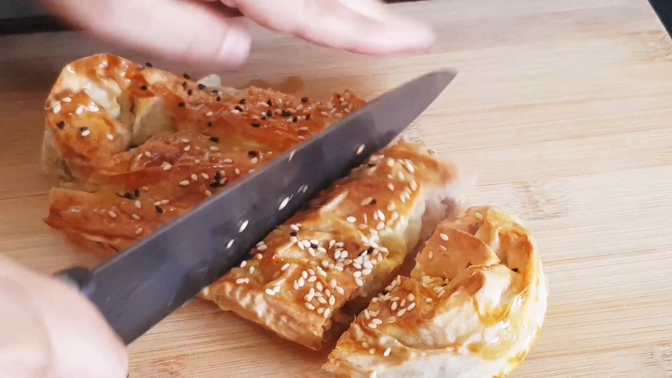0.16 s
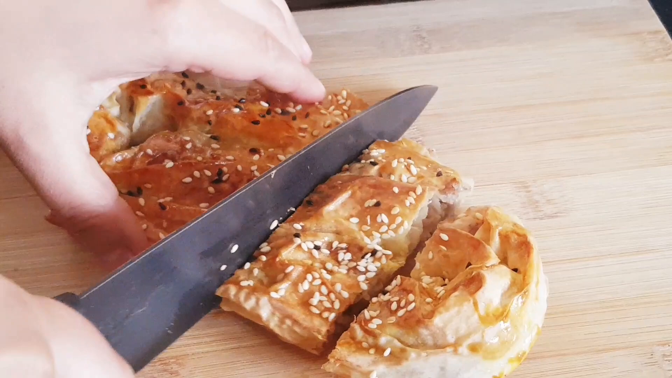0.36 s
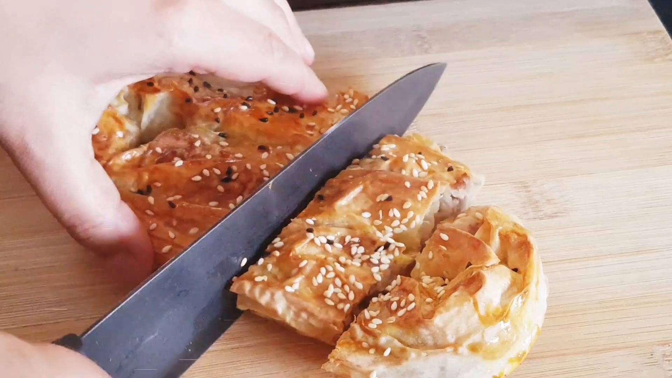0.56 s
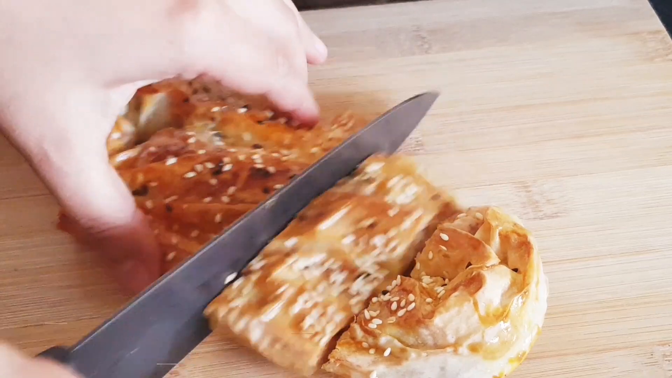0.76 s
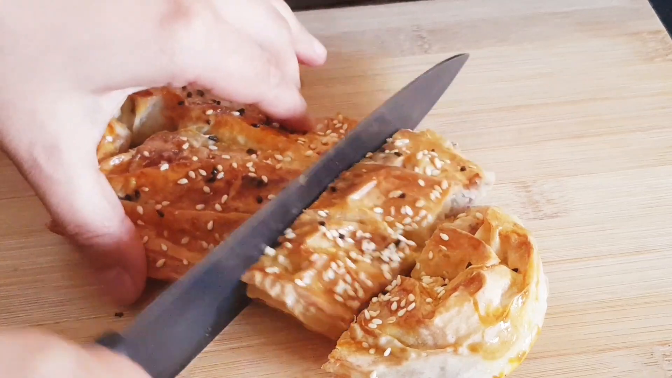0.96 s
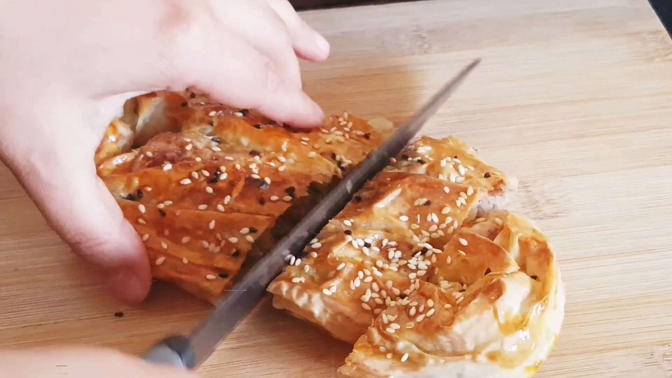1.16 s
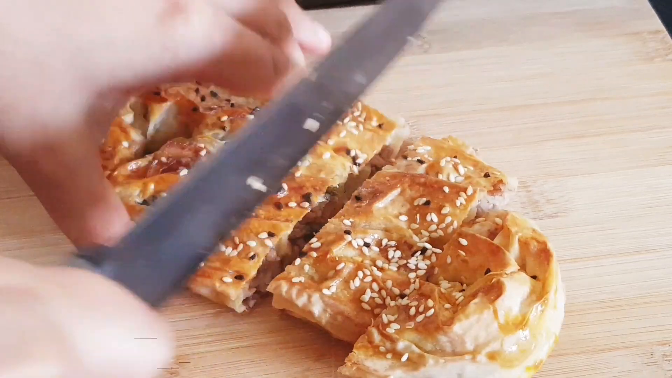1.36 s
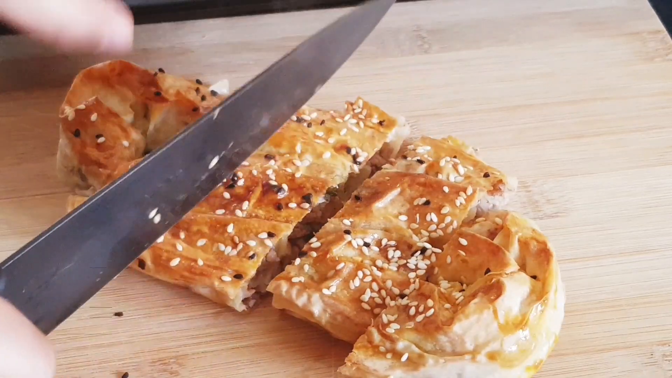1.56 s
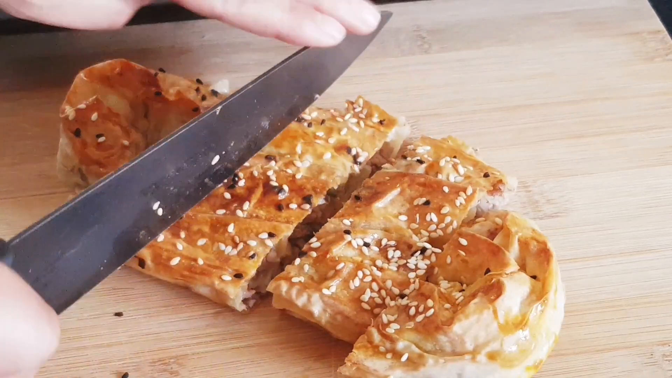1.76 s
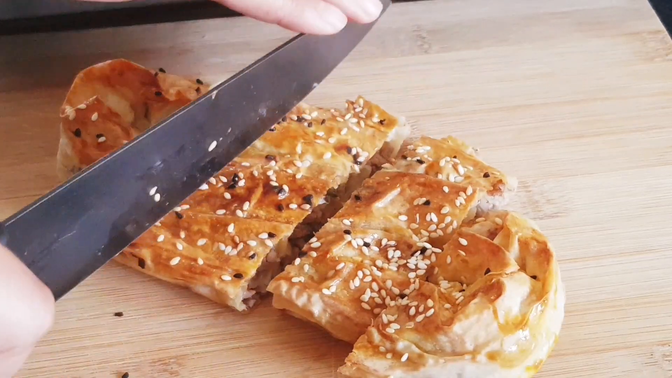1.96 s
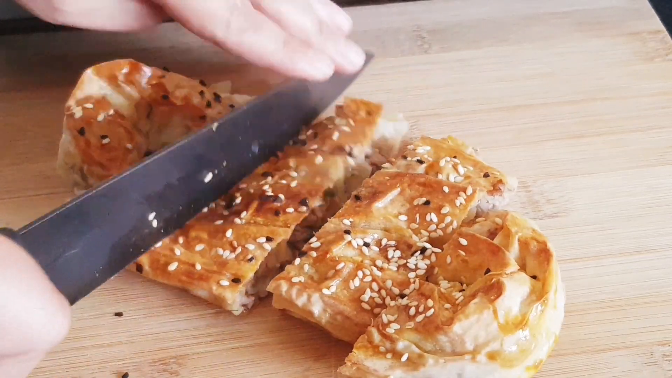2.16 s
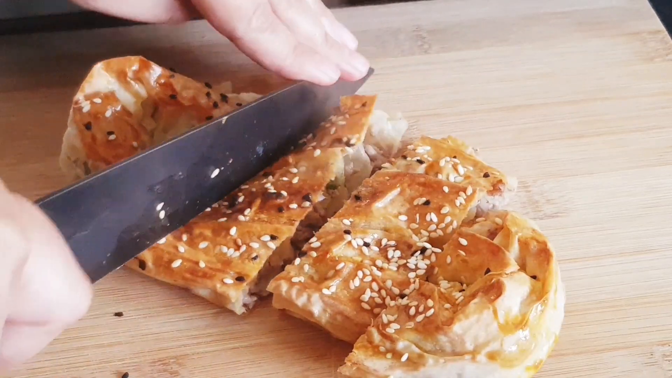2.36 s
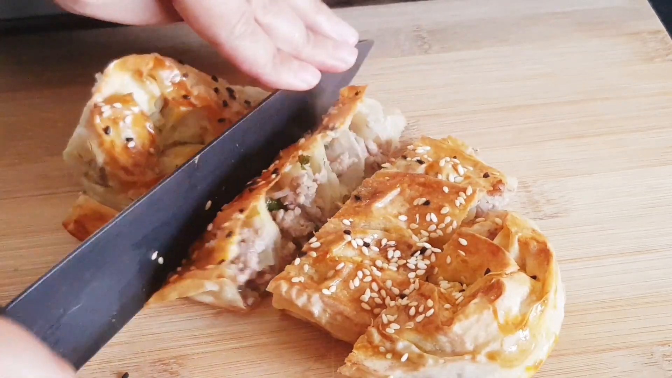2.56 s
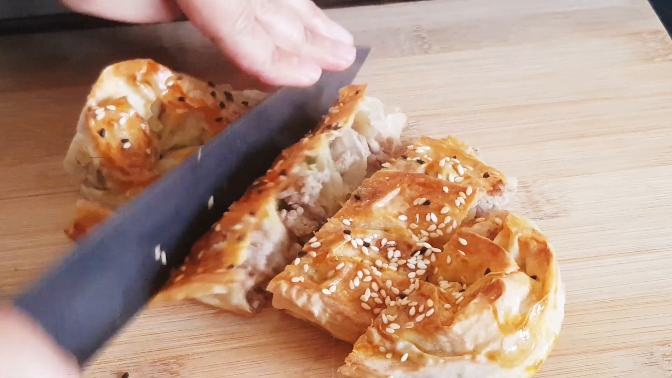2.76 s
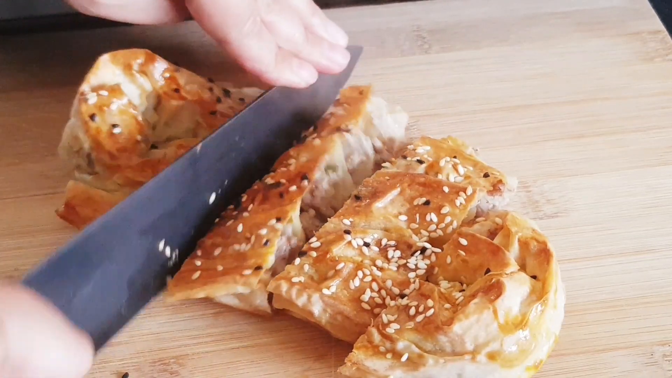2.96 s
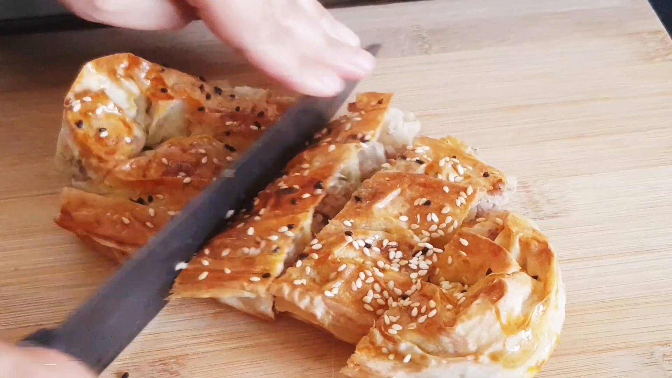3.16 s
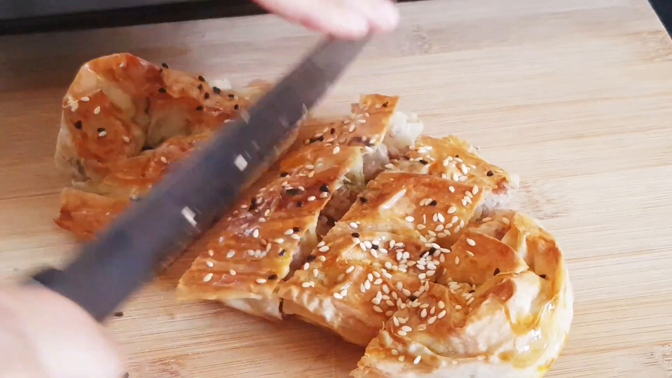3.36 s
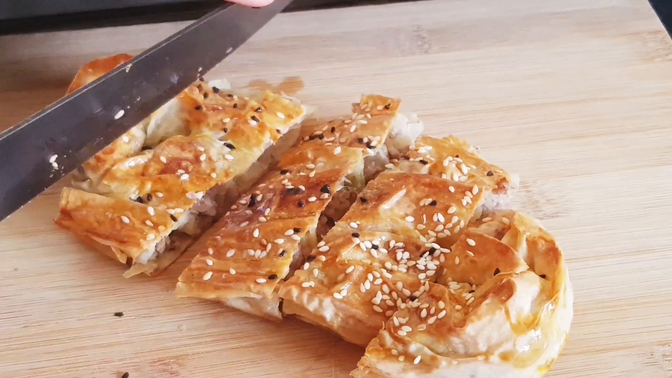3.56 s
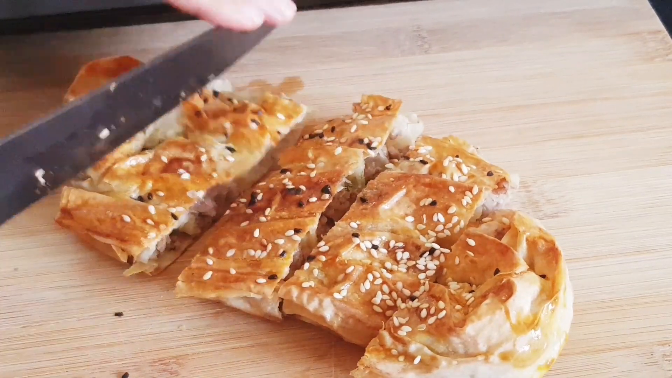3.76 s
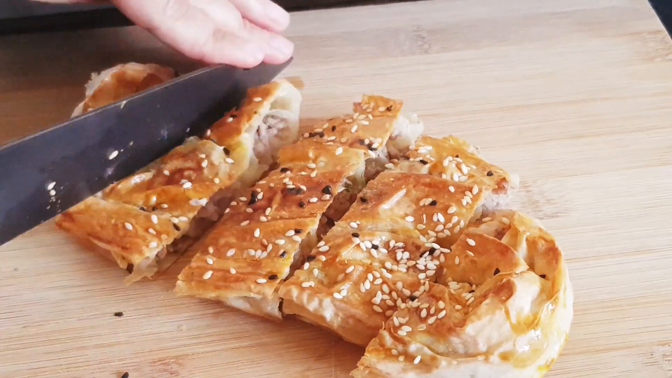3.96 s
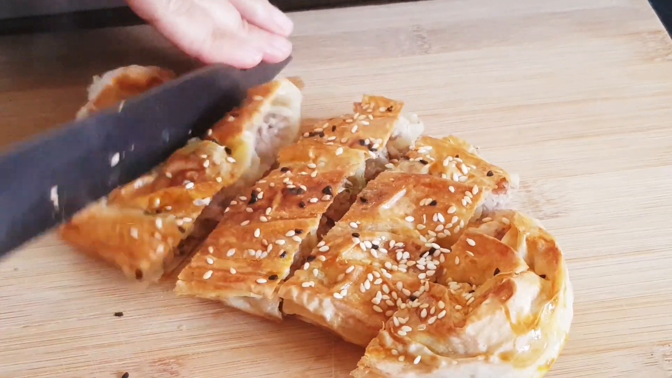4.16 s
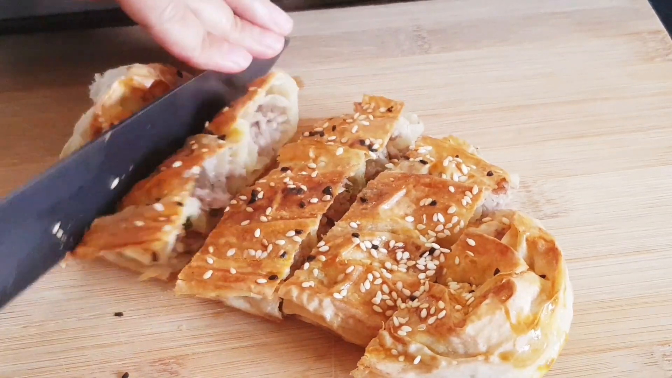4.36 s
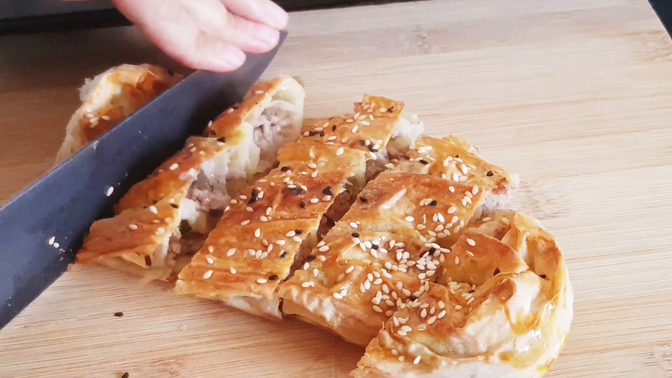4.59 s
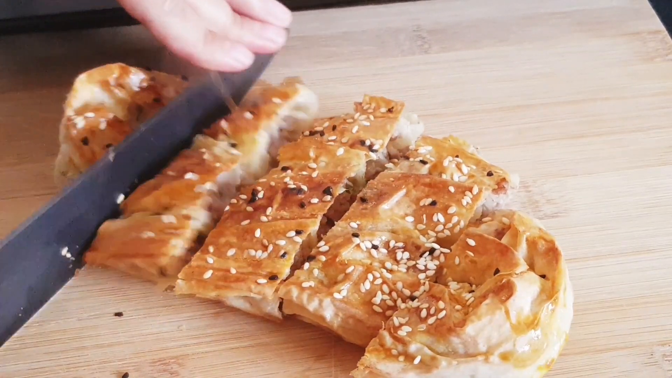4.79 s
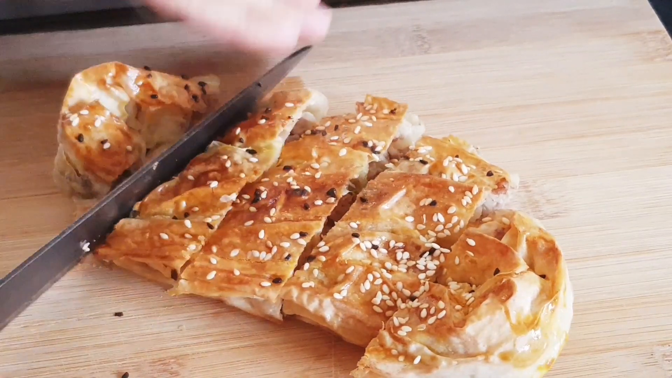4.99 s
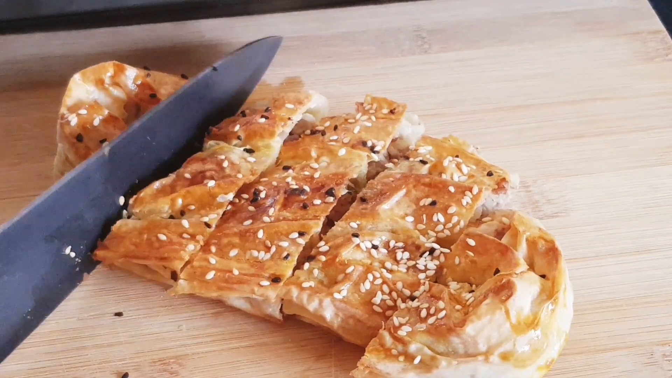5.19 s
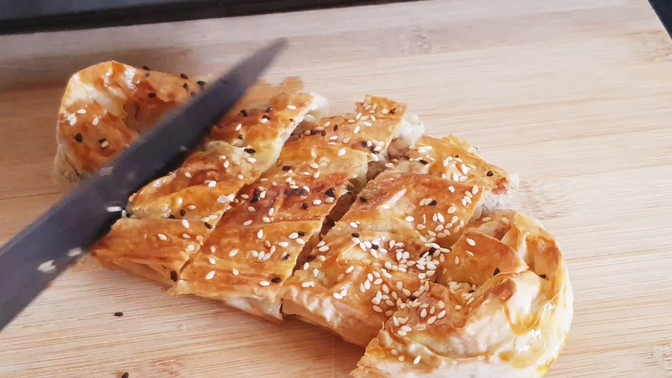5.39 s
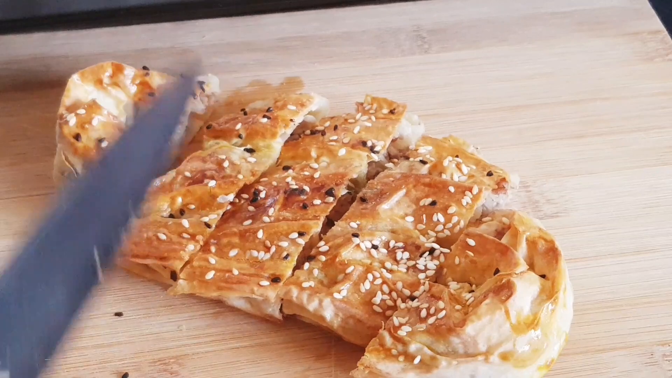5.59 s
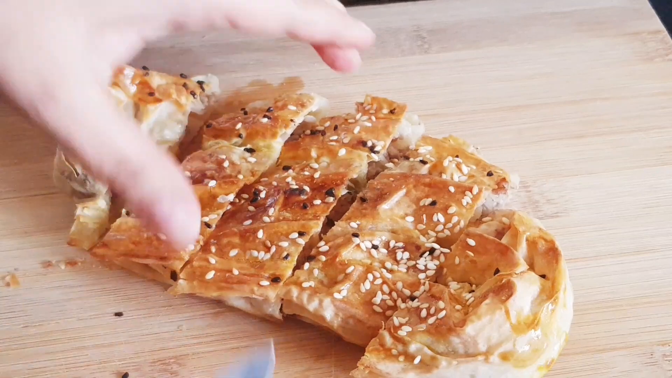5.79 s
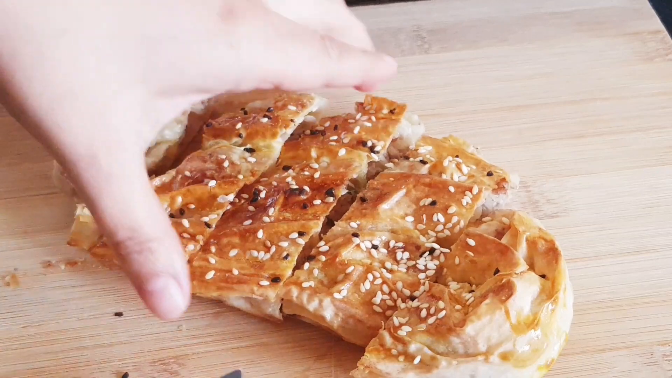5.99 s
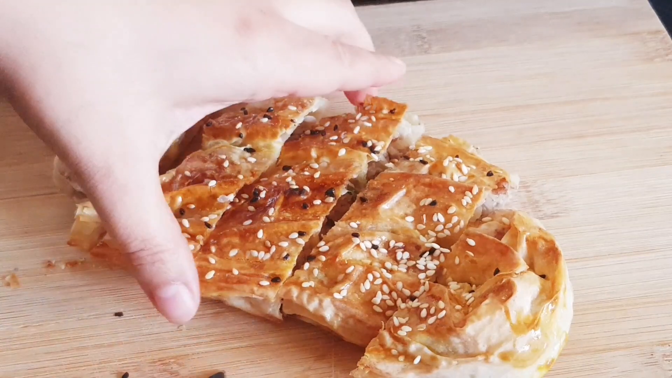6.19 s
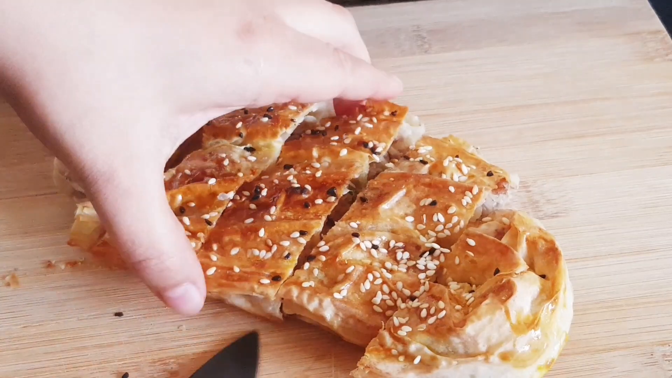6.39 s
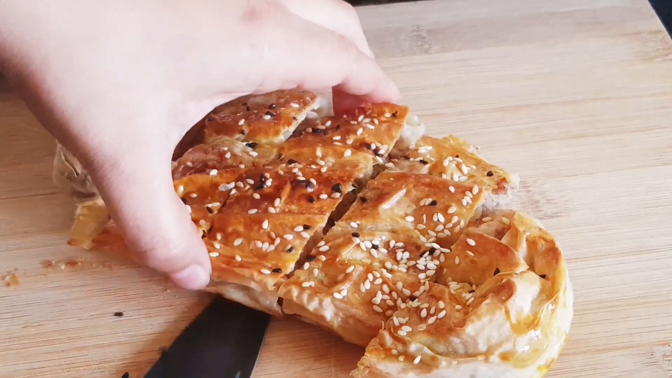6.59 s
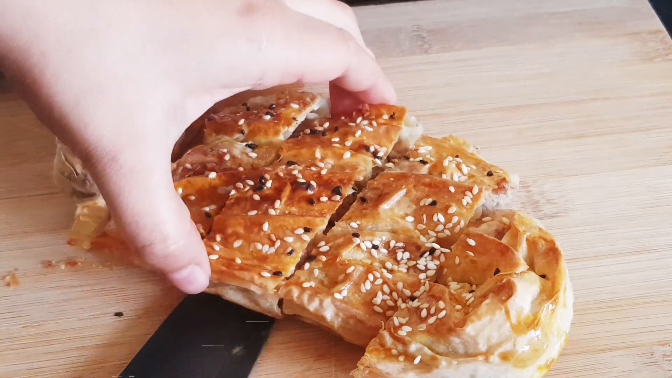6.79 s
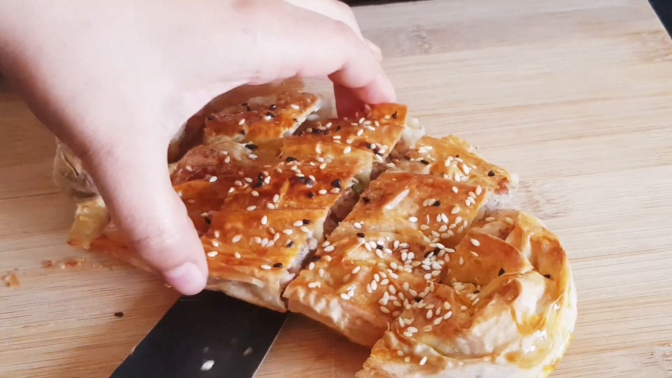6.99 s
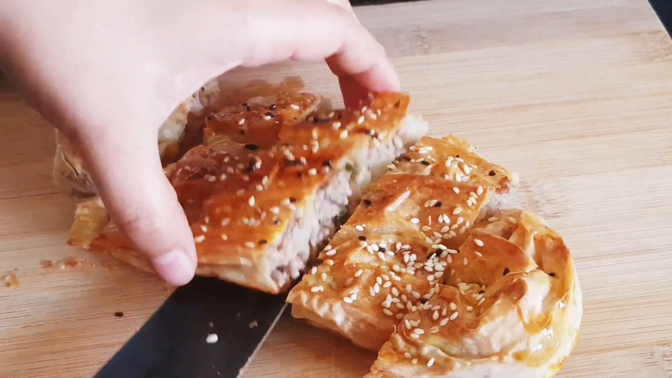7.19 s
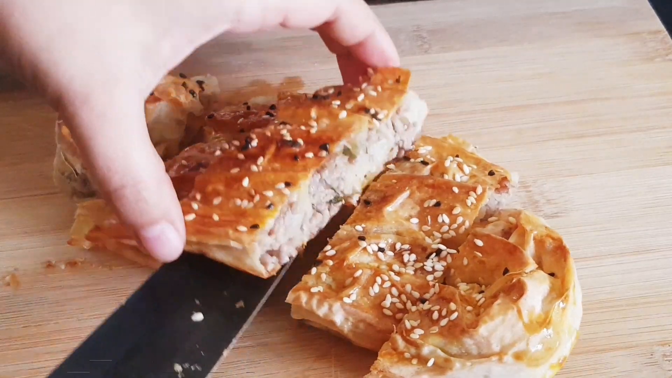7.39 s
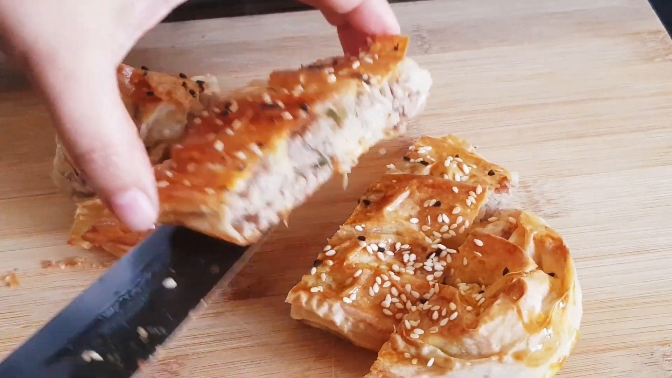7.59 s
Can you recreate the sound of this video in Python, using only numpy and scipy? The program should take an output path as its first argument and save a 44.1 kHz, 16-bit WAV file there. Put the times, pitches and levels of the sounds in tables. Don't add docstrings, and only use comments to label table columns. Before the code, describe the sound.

Brittle crust crunches and snaps under a heavy blade, with dull board knocks, a low refrigerator hum and a faint final slide of steel.

```python
import sys
import numpy as np
from scipy import signal
from scipy.io import wavfile
from scipy.ndimage import uniform_filter1d

SR = 44100
rng = np.random.default_rng(int(sys.argv[2]) if len(sys.argv) > 2 else 0)


def wav_out(sig):
    wavfile.write(sys.argv[1], SR, np.round(np.clip(np.atleast_2d(sig).T, -1, 1) * 32767).astype(np.int16))


def rack_gain(trim_db):
    fader = np.asarray(trim_db, float)
    return 10 ** (fader / 20)


N = 336924

# (frequency [Hz], level [dB])
CRUST = [(1470, -45.5), (2500, -1.5), (3980, -3), (4560, -1.5), (5870, -4), (8570, -7.5), (10200, -5.5),
         (12000, -3.5), (15900, -6.5), (16500, -35)]
# (time [s], peak level [dB], blow frequency [Hz], edge tick [dB], board ring [dB], woody
# noise tail [dB]), the last three against the blow
KNOCKS = [
    (0.827, -13.5, 1320, -41, -18, -24),
    (2.741, -7, 1470, -13, -16.5, -21.5),
    (4.771, -3, 1268, -19.5, -14, -21),
    (6.165, -55.5, 1240, -26, -16.5, -7),
]


def evened(x):
    return x / np.sqrt(np.mean(x ** 2) + 1e-20)


def read(points, hz):
    f, value = np.transpose(points)
    return np.interp(np.log(hz + 1), np.log(f + 1), value)


def add(mix, s, sound):
    part = mix[..., round(s * SR):][..., :sound.shape[-1]]
    part += sound[..., :part.shape[-1]]


def causal(points):
    hz = abs(np.fft.fftfreq(4096, 1 / SR))
    log_gain = np.log(rack_gain(np.maximum(read(points, hz), -70)))
    phase = -signal.hilbert(log_gain).imag
    taps = np.fft.ifft(np.exp(log_gain + 1j * phase)).real[:1024]
    return taps / np.linalg.norm(taps)


def resonate(x, hz, width):
    r = np.exp(-np.pi * abs(width) / SR)
    if np.ndim(hz) == 0:
        return 2 * signal.lfilter([1 - r], [1, -r * np.exp(2j * np.pi * hz / SR)], x).real
    turn = np.exp(2j * np.pi * np.cumsum(hz) / SR)
    return 2 * (turn * signal.lfilter([1 - r], [1, -r], x / turn)).real


def ring(modes, seconds=.6):
    t = np.arange(round(seconds * SR)) / SR
    return sum(rack_gain(db - 60 * t / t60) * np.sin(2 * np.pi * (hz * t + rng.random()))
               for hz, db, t60 in modes)


def panned(x, pan_db):
    return rack_gain([[pan_db / 2], [-pan_db / 2]]) * x


def fridge():
    # (frequency [Hz], width [Hz], level [dB], steady share [ratio])
    tones = [(49.2, 2.7, -48, 5.7), (99.6, 7.2, -59.5, 4.8), (160.3, 9.2, -69.5, 0.36),
             (200, 9.4, -74.5, 0.49), (290.4, 6, -79, 1), (498.6, 6, -70.5, 3.4), (590, 6.3, -81, 1.2)]
    t, out = np.arange(N) / SR, 0
    for hz, width, db, steady in tones:
        skirt = evened(resonate(resonate(rng.standard_normal(N), hz, width), hz, width))
        line = np.sin(2 * np.pi * (hz * t + rng.random()))
        out = out + rack_gain(db) * evened(steady * line + skirt)
    return panned(out, 0.82)


def air():
    # (frequency [Hz], level [dB per Hz])
    hiss_spectrum = [(45, -29.5), (70, -13.5), (127, -15.5), (172, -22.5), (346, -27.5), (502, -29.5),
                     (837, -36), (3370, -53), (3970, -55), (7430, -57.5), (8540, -65), (10500, -58.5),
                     (12700, -52), (16000, -55)]
    # (frequency [Hz], left-right likeness [ratio])
    likeness = [(60, 0.85), (180, 0.92), (550, -0.18), (1650, -0.049), (4970, -0.48), (15000, 0.083)]
    frames, hz = N // 512 + 5, np.fft.rfftfreq(2048, 1 / SR)
    a, b, c, d, patches = rng.standard_normal((frames, 1025, 5)).T
    patches = evened(uniform_filter1d(uniform_filter1d(patches, size=20, axis=0), size=8, axis=1))
    same = np.clip(read(likeness, hz), -1, 1)[:, None]
    left = a + 1j * b
    right = same * left + np.sqrt(1 - same ** 2) * (c + 1j * d)
    z = np.array([left, right]) * rack_gain(read(hiss_spectrum, hz)[:, None] - 0.5 * patches)
    hiss = signal.istft(z, nperseg=2048, noverlap=1536)[1][:, :N]
    return panned(rack_gain(-58.5) * evened(hiss), 0.77)


def pressure():
    # (peak time [s], swell
    # [s], peak level [dB], fade [dB per s], dull crumb against the crackle [dB])
    presses = [(.317, .002, -72, 115, 2.5), (0.459, 0.018, -58.5, 204, 3.5),
               (0.545, 0.021, -58.5, 248, 5.5), (0.584, 0.049, -58.5, 138, -0.5),
               (0.714, 0.046, -45.5, 261, 7.5), (0.828, 0.027, -54, 299, 11.5), (0.863, 0.043, -48, 277, 1),
               (1.027, 0.052, -62.5, 276, 6.5), (1.972, 0.002, -53.5, 160, 1.5),
               (2.06, 0.03, -62.5, 601.5, 0.5), (2.083, 0.007, -42, 160.5, -10.5),
               (2.413, 0.058, -42.5, 101, -1.5), (2.56, 0.036, -78, 100, 0),
               (2.687, 0.0009, -70.5, 1495, -4), (2.74, 0.022, -49, 897.5, -0.5),
               (2.744, 0.0038, -35.5, 424, -2.5), (2.79, 0.0097, -63.5, 121, -3),
               (3.712, .002, -73.5, 1500.5, 21), (3.85, 0.004, -58, 151, -2), (3.79, .002, -67, 151.5, -9),
               (3.915, 0.04, -44.5, 191.5, -2.5), (4.02, 0.028, -69.5, 90.5, -3),
               (4.204, 0.036, -32.5, 313, -6), (4.229, 0.026, -38.5, 175.5, -9.5),
               (4.46, .03, -62.5, 197, 3), (4.493, 0.034, -45, 150.5, 0.5), (4.765, 0.023, -53, 399, -2.5),
               (4.78, .004, -62, 114.5, -6.5)]
    shifting_flakes = [(.072, .002, -74.5, 60, -4), (.17, 0.043, -94, 80, 25.5),
                       (1.22, 0.081, -77.5, 105, 12.5), (1.295, 0.0068, -84, 152, -8),
                       (2.9, 0.15, -67, 149, 10.5), (2.987, 0.022, -71.5, 200, 15),
                       (3.16, 0.073, -81, 100.3, 10.5), (3.27, 0.019, -72.5, 251, -4),
                       (5.46, 0.055, -80.5, 129, -3), (6.171, 0.0045, -80.5, 88.7, 0),
                       (6.3, 0.0082, -76.5, 120, 4), (6.5, 0.1, -75, 60, -1), (6.66, 0.067, -71, 200, -4),
                       (6.75, 0.012, -75, 300, -9), (6.97, 0.18, -73.5, 100, -1),
                       (6.96, 0.061, -91, 250, 3), (7.112, 0.0013, -70.5, 156, -5.5),
                       (7.43, 0.045, -79, 146, -1.5)]
    bite_db, faded_db = 10.5, 47
    creep_s, creep_db = 0.0049, -20
    levels = np.zeros((3, N))
    for peak_s, swell, db, fade, dull_db in presses + shifting_flakes:
        swell, fade = max(swell, .0005), max(fade, 30)
        t = np.arange(-swell, faded_db / fade, 1 / SR)
        faded = fade * np.maximum(t, 0)
        level = db + bite_db * np.minimum(t, 0) / swell - faded
        thin = 1 - 0.65 * dull_db - 0.31 * faded
        dull = dull_db + 0.033 * faded
        creep = rack_gain(level[0] + creep_db) * np.linspace(0, 1, round(creep_s * SR))
        add(levels, max(peak_s - swell - creep_s, 0), creep[None])
        add(levels, peak_s - swell, rack_gain([level, level + thin, level + dull]))
    return levels


def patchy(x):
    z = signal.stft(x, nperseg=256)[2]
    patches = rng.standard_normal(z.shape[1:][::-1]).T
    patches = evened(uniform_filter1d(uniform_filter1d(patches, size=6, axis=0), size=8, axis=1))
    return signal.istft(z * rack_gain(2.3 * patches), nperseg=256)[1][:, :N]


def crumble():
    # (frequency [Hz], level [dB])
    crumb_spectrum = [(320, -17), (550, -2), (666, -14), (731, -4), (1130, -3), (2160, -8), (3000, -14),
                      (3900, -18.5), (6600, -120)]
    fractures_per_s, spread_db = 1300, 2.8
    clumps = evened(uniform_filter1d(uniform_filter1d(rng.standard_normal(N), size=250), size=250))
    levels = pressure() * rack_gain(2 * clumps)
    size = rack_gain(spread_db * np.minimum(rng.exponential(1, N), 2.6))
    size = size * (rng.random(N) < fractures_per_s / SR)
    bursts = signal.lfilter([1], [1, -np.exp(-1 / (0.00033 * SR))], size)
    a, b, c, d = rng.standard_normal((4, N))
    bright = (evened(bursts) + 0.6) * np.array([a + b, a - b])
    bright = signal.oaconvolve(bright, causal(CRUST)[None])[:, :N]
    lowpass = signal.firwin(33, 9000, fs=SR)
    thick = signal.oaconvolve(bright, lowpass[None], "same")
    soft = evened(uniform_filter1d(bursts, size=60)) + 0.67
    soft = soft * np.array([c + 0.89 * d, c - 0.81 * d])
    soft = evened(signal.oaconvolve(soft, causal(crumb_spectrum)[None])[:, :N])
    crackle = levels[0] * evened(thick) + levels[1] * evened(bright - thick)
    crumbs = levels[2] * soft
    return patchy(panned(crackle * rack_gain(-1.5), 3.5) + panned(crumbs * rack_gain(-1.0), 1.7))


def snaps(cracks):
    # (frequency [Hz], level [dB])
    layer = [(1500, -38.5), (2600, -6.5), (3500, -8.5), (5000, -4.5), (7000, -2), (8800, -6.5), (12500, -1),
             (16000, -8)]
    # (frequency [Hz], level [dB])
    slice_body = [(400, -22), (800, -10), (1250, -4), (1550, -4), (1900, -2), (2300, -8), (2900, -27),
                  (6000, -60)]
    out, t = np.zeros((2, N)), np.arange(900) / SR
    noise = rng.standard_normal((len(cracks), 2, 900))
    place = rng.uniform(-0.41, 1, len(cracks))
    crust, body = causal(layer), causal(slice_body)
    decay = np.exp(-t / .00045) + rack_gain(-16) * np.exp(-t / 0.0036)
    for (s, db, hz, dull_db), (a, b), side in zip(cracks, noise, place):
        burst = decay * np.array([a + 0.49 * b, a - 0.19 * b])
        burst = signal.oaconvolve(burst, crust[None])[:, :900]
        burst = burst + 2.7 * resonate(burst, hz, 3000)
        tap = np.convolve(np.exp(-t / 0.00099) * b, body)[:900]
        crack = burst / abs(burst).max() + rack_gain(dull_db) * tap / abs(tap).max()
        left, right = panned(rack_gain(db) * crack, 2.0 + 0.68 * side)
        add(out[0], s + 0.00066, left)
        add(out[1], s + 0.00066 + side * .00007, right)
    return out


def kitchen():
    # (frequency [Hz], t60 [s])
    decay_times = [(100, 1), (500, 0.53), (1400, 0.39), (4000, 0.25), (9000, 0.17), (15000, 0.13)]
    taps = np.zeros((2, SR))
    at = np.arange(100, SR - 20, 20) + rng.integers(0, 20, (2, (SR - 101) // 20))
    np.put_along_axis(taps, at, rng.choice([-1., 1.], at.shape), 1)
    hz, t, z = signal.stft(taps, SR, nperseg=256)
    tail = signal.istft(z * rack_gain(-60 * t / read(decay_times, hz)[:, None]), SR, nperseg=256)[1]
    return tail / np.linalg.norm(tail[0])


def rattle(modes):
    out = 0
    for hz, db, t60 in modes:
        moved = (hz * (1 + .03 * rng.standard_normal()), db, t60)
        unrest = evened(uniform_filter1d(rng.standard_normal(round(.6 * SR)), size=900))
        out = out + ring([moved]) * (1 + .6 * unrest)
    return out


def thumps():
    # (time [s], peak level [dB], deep modes [dB], board modes [dB], rise [s]),
    # both mode levels against the upper ones
    pushes = [(0.549, -46, -15, 6, 0.023), (0.691, -46, -21, 1.5, 0.018), (0.829, -34, -4, 4, 0.0077),
              (0.9, -40, -4, -2, 0.0069), (1.016, -58, 16.5, -24, 0.0061), (2.186, -43, -24.5, 8.5, 0.0014),
              (2.443, -41.5, -2.5, -1, 0.0048), (2.749, -22.5, -5, -6.5, 0.0014),
              (2.837, -33, -11, -5, 0.0058), (2.981, -26.5, -14, -11.5, 0.0071),
              (3.089, -41.5, -2.5, -11, 0.0056), (3.93, -36.5, -5.5, 4.5, 0.008),
              (4.2, -32.5, -4, 5.5, 0.023), (4.31, -39, -2, -16.5, 0.005), (4.563, -34.5, -4, -4, 0.012),
              (4.769, -29, -7.5, 7.5, 0.002), (4.861, -39.5, -9, 12.5, 0.0099),
              (6.163, -38, -22, -3.5, 0.026), (6.215, -43, -14.5, -22, 0.0056)]
    # (frequency [Hz], level [dB], t60 [s])
    counter_deep = [(67.47, 3, 0.69), (97.8, 1.5, 0.66)]
    counter_upper = [(138.2, -1.5, 0.44), (167.3, -3.5, 0.45), (204.6, -3, 0.28), (259, -8, 0.18)]
    board_low = [(292, -1.5, 0.27), (352, -1, 0.21), (447, -3, 0.05), (421.2, -2.5, 0.27),
                 (484, -4.5, 0.39), (553, -4, 0.21)]
    out, t = np.zeros(N), np.arange(round(.6 * SR)) / SR
    for s, db, deep_db, board_db, rise in pushes:
        body = rack_gain(deep_db - 5.5) * rattle(counter_deep)
        body = body + rack_gain(-7.0) * rattle(counter_upper)
        body = body + rack_gain(board_db - 12.5) * rattle(board_low)
        add(out, s, rack_gain(db) * body * (1 - np.exp(-t / max(rise, .001))))
    return panned(out, 0.7)


def knocks():
    # (frequency [Hz], level [dB], t60 [s])
    board_modes = [(474.3, -13.5, 0.31), (581, 2.5, 0.038), (807, -11.5, 0.29), (1033, -18.5, 0.42),
                   (1130, -31, 0.73), (1470, -23, 0.4), (1600, -30, 0.29)]
    # (frequency [Hz], level [dB])
    woody_tail_spectrum = [(120, -32), (200, -10), (323, -4.5), (480, -7), (610, -6), (1140, -1), (2290, -34),
                           (3100, -38), (3900, -55), (4800, -40), (9000, -50.5), (11700, -76.5), (19800, -120)]
    out, t, long = np.zeros((2, N)), np.arange(400) / SR, np.arange(round(.5 * SR)) / SR
    for s, db, hz, tick_db, ring_db, woody_tail_db in KNOCKS:
        u = (t - .0029) * hz
        add(out, s, rack_gain(db) * np.exp(-(u / 0.74) ** 2) * np.sin(-2 * np.pi * u))
        tick = np.convolve(rng.standard_normal(len(t)) * np.exp(-t / 0.0018), causal(CRUST))
        add(out, s + 0.0019, rack_gain(db + tick_db) * tick / abs(tick).max())
        board = ring(board_modes)
        add(out, s + .004, rack_gain(db + ring_db) * board / abs(board).max())
        a, b = rng.standard_normal((2, len(long))) * rack_gain(db + woody_tail_db - 60 * long / 0.28)
        woody_tail = signal.oaconvolve([a + .5 * b, a - .5 * b], causal(woody_tail_spectrum)[None])
        add(out, s + 0.0048, woody_tail)
    return panned(out, 3.2)


def face():
    # (frequency [Hz], level [dB], t60 [s])
    face_modes = [(287, -7.5, 0.35), (392, -5.5, 0.28), (479, 1, 0.3), (622, -10, 0.35), (671, -8.5, 0.29),
                  (730, -0.5, 0.29), (807, 1, 0.18), (1034, -3, 0.341), (1089, -6, 0.43),
                  (1163, -6.5, 0.23), (1201, 0.5, 0.16), (1292, 0.5, 0.36), (1410, -8, 0.38),
                  (1836, -22, 0.41)]
    out = np.zeros(N)
    for s, db, *_ in KNOCKS:
        board = ring(face_modes)
        add(out, s + .0045, rack_gain(db - 22.5) * board / abs(board).max())
    return panned(out, 2.0)


def catches():
    # (time [s], length [s], frequency [Hz], level [dB])
    grain_catches = [(6.157, 0.082, 1023, -63.5), (6.19, 0.064, 1460, -76), (6.234, .09, 910, -70.5),
                     (6.291, 0.064, 1600, -71), (6.301, .09, 1050, -78), (6.298, .07, 2300, -82),
                     (6.41, .045, 1600, -72), (6.408, 0.083, 1000, -70), (6.471, 0.044, 1750, -69.5),
                     (6.491, .06, 940, -67), (6.5, .1, 1560, -73), (6.517, .08, 1035, -67),
                     (6.576, .09, 1600, -73), (6.58, 0.082, 2250, -77), (6.581, .08, 3000, -73),
                     (6.59, .05, 960, -75), (6.63, 0.077, 6000, -78), (6.728, 0.033, 6000, -75),
                     (6.483, 0.13, 2600, -80), (6.24, 0.073, 503, -64), (6.416, .08, 260, -70),
                     (6.86, .07, 1553, -75.5), (6.88, .11, 4500, -78), (6.951, .05, 2400, -77),
                     (7.014, .04, 1900, -79.5)]
    out = np.zeros(N)
    for s, length, hz, db in grain_catches:
        u = np.arange(0, 1, 1 / (length * SR))
        width = 0.074 * hz
        noise = rng.standard_normal(2 ** 13)[:len(u)]
        mode = evened(resonate(resonate(noise, hz, width), hz, 2.0 * width))
        add(out, s, rack_gain(db) * mode * np.sin(np.pi * np.sqrt(u)))
    return panned(out, 4.0)


def slide():
    # (time [s], ringing steel [dB], rubbed wood against it [dB])
    rubs = [
        [(6.16, -65, 11.5), (6.172, -79, -3), (6.24, -76, -30), (6.3, -66.5, -11), (6.4, -71.5, -20),
         (6.5, -67.5, -2.5), (6.63, -67, 1.5), (6.72, -96.5, 15)],
        [(6.8, -89, 7), (6.872, -66.5, -3.5), (6.968, -68.5, 3.5), (7.1, -83, -7)],
    ]
    # (frequency [Hz], width [Hz], level [dB])
    blade_modes = [(523, 115, 3), (1010, 160, -6), (1600, 160, -13), (2560, 130, -6), (5900, 170, -16),
                   (7400, 310, -10.5), (7900, 260, -13)]
    # (frequency [Hz], level [dB])
    grain_spectrum = [(410, -36), (700, -20), (823, -11), (1900, 13), (4230, -7), (6000, -33), (7800, -40),
                      (13200, -120)]
    # (frequency [Hz], width [Hz], level [dB])
    squeak_modes = [(1800, 600, -14), (2690, 290, -6.5), (4200, 450, -13)]
    s, steel_db, wood_db = np.transpose(np.concatenate(rubs))
    t, out = np.arange(s[0], s[-1], 1 / SR), np.zeros(N)
    under_s = rubs[1][0][0]
    unevenness = evened(uniform_filter1d(rng.standard_normal(len(t)), size=400))
    rub = rng.standard_normal(len(t)) * rack_gain(2.0 * unevenness)
    wander = uniform_filter1d(rng.standard_normal((len(blade_modes), len(t))), size=2600)
    contact = rack_gain(6.0 * evened(wander))
    steel = 0
    for (hz, width, db), touch in zip(blade_modes, contact):
        mode = resonate(resonate(rub, hz, width), hz, 2.0 * width)
        steel = steel + rack_gain(db) * evened(mode * touch) * np.sqrt(width)
    steel = evened(steel) * (t < under_s)
    climb = 1 + 0.18 * (t - np.where(t < under_s, s[0], under_s))
    wood = evened(np.convolve(rub, causal(grain_spectrum))[:len(t)])
    squeak = 0
    for (hz, width, db), touch in zip(squeak_modes, contact[::-1]):
        mode = resonate(resonate(rub, hz * climb, width), hz * climb, width)
        squeak = squeak + rack_gain(db) * evened(mode * touch)
    wood = evened(wood + squeak)
    add(out, s[0], rack_gain(np.interp(t, s, steel_db) - 3) * steel)
    add(out, s[0], rack_gain(np.interp(t, s, steel_db + wood_db) - 3.5) * wood)
    lowest = [(hz, db, 0.39) for hz, width, db in blade_modes[:2]]
    add(out, s[0], rack_gain(-62.5) * ring(lowest))
    return panned(out, 6.6)


def scene():
    # (time [s], peak level [dB], brightest frequency [Hz])
    snapping_layers = [(0.518, -29.5, 6500), (0.5398, -28.5, 4200), (0.5494, -36, 3500), (0.6797, -22.5, 12000),
                       (0.8657, -30.5, 4430), (3.86, -25.5, 6860), (2.0797, -16.5, 13740), (2.095, -15.5, 14520),
                       (2.1058, -15.5, 15510), (2.1493, -19, 8940), (2.1807, -14, 12700), (2.398, -21, 13040),
                       (2.41, -19, 5220), (2.419, -20, 13500), (2.4226, -19, 6000), (2.463, -21, 5700),
                       (4.158, -18, 7920), (3.8795, -19, 5156), (3.8918, -21, 13600), (3.9036, -23, 11370),
                       (3.9216, -23, 10600), (4.174, -19.5, 12720), (4.1783, -14.5, 11400), (4.1889, -9.5, 6450),
                       (4.2027, -11, 10410), (4.2062, -12, 12660), (4.229, -16.5, 12600), (4.2412, -16, 11630),
                       (4.258, -17.5, 14560), (4.4986, -16, 11040),
                       (0.25, -57, 6600), (.4208, -60, 12000), (0.5338, -46, 11900), (0.5793, -31, 4500),
                    (0.6279, -57, 11400), (0.6563, -29, 11100), (0.7298, -42, 3300), (0.8226, -51, 4820),
                    (0.86, -32.5, 11200), (1.285, -51, 7200), (1.9608, -45, 13600), (1.9777, -39, 11660),
                    (2.0402, -38, 12740), (2.061, -31.5, 12400), (2.0766, -16, 9970), (2.1585, -31, 13800),
                    (2.1615, -32, 12700), (2.1730, -28.5, 12900), (2.356, -49.5, 7090), (2.3807, -30, 5300),
                    (2.4505, -20.5, 14650), (2.4565, -27.5, 13000), (2.483, -30, 9000), (2.4910, -25, 3886),
                    (2.5321, -38.5, 3010), (2.6120, -45, 6270), (2.6282, -45, 11000), (2.6952, -45, 11800),
                    (2.7075, -36, 13270), (3.7917, -35, 7000), (3.8763, -25, 7430), (3.8948, -18.5, 12780),
                    (3.9058, -21, 14890), (3.9283, -18, 6150), (4.1293, -55, 7290), (4.1319, -51.5, 7400),
                    (4.1486, -34, 3587), (4.1614, -21, 12740), (4.3690, -35, 12200), (4.4477, -49.5, 7900),
                    (4.4781, -33.5, 13950), (4.4893, -29, 4630), (4.4947, -21.5, 10530),
                    (4.5649, -37, 4340), (4.7562, -36.5, 9720), (4.7604, -38, 14000), (4.872, -49, 13000),
                    (4.9175, -47, 12000), (5.8185, -59, 12900), (6.6525, -49, 7860), (6.7588, -55, 13400),
                    (7.131, -51, 4010), (7.178, -54, 7800)]
    # (time [s], peak level [dB], brightest frequency [Hz], dull part [dB])
    lone_cracks = [(0.0737, -42.5, 13100, -16), (0.0908, -43, 12900, -17), (0.3174, -40.5, 12600, -6),
                   (0.454, -48, 4870, -0.5), (0.4662, -44.5, 5300, -4), (0.651, -31, 11070, -26.5),
                   (1.292, -49, 6600, -20), (1.97, -32, 13380, -2.5), (2.0315, -46, 7510, -15),
                   (2.0447, -36.5, 7600, -18), (2.0553, -32.5, 13680, -37.5), (2.3338, -44.5, 5880, -6.5),
                   (2.3652, -24.5, 6200, -19), (2.6846, -24, 12400, -22.5), (2.7207, -31, 4890, -6),
                   (2.7344, -33.5, 12760, -10), (2.068, -9.5, 8000, -11), (3.711, -54.5, 5550, 11.5),
                   (3.76, -64.5, 5000, 16.5), (4.718, -63, 5060, 5.5), (3.7865, -32.5, 10900, -1.5),
                   (3.8313, -37, 14240, -19), (3.8468, -19.5, 5890, -18.5), (4.0481, -45, 12670, -2.5),
                   (4.1528, -19, 6510, -21.5), (4.358, -35, 11200, -18.5), (4.4742, -34.5, 14620, -5.5),
                   (4.746, -30.5, 14400, -13), (4.9084, -42.5, 7400, -17.5), (6.7433, -46, 12900, -27.5),
                   (7.1133, -59.5, 14250, -16.5), (7.439, -54, 11700, -3.5)]
    further_splinters = [(3.845, -36, 6500, -16), (3.8575, -33, 7000, -20.5), (3.8615, -33, 6800, -21),
                         (3.9062, -25, 10000, -1.5), (3.8948, -32, 4000, 3.5), (4.1695, -31, 3500, 0),
                         (4.1805, -17, 11500, -10), (4.1965, -20, 11500, -20), (4.2172, -16, 5800, -20),
                         (4.211, -18, 12000, -21), (4.1641, -26.5, 12000, -19.5), (4.1852, -21, 11000, -19.5),
                         (4.5067, -29.5, 11000, -16), (1.7, -32, 9000, -15.5), (2.0885, -25.5, 13500, -20.5),
                         (2.1085, -22, 14500, -20), (2.4265, -26.5, 5200, -15.5), (2.498, -30, 13000, -20),
                         (2.7387, -33, 5000, -7), (.6505, -36.5, 9400, -25), (0.65, -31, 6000, -18)]
    layers = [(s, db, hz, -21 - 0.065 * (db + 18.0)) for s, db, hz in snapping_layers]
    crust = crumble() + snaps(lone_cracks + layers + further_splinters)
    wood = knocks() + face()
    steel = slide() + catches()
    sent = rack_gain(-5) * crust + rack_gain(-8.5) * wood + rack_gain(-2.5) * steel
    wet = signal.fftconvolve(sent.mean(0)[None], kitchen(), axes=1)[:, :N]
    near = crust + wood + steel + thumps() + fridge()
    near[1] = np.roll(near[1], 5)
    return near + panned(wet, 1.0) + air()


def band_limit(x):
    return signal.sosfilt(signal.butter(12, 17150, fs=SR, output="sos"), x)


def record(dry):
    dry = signal.sosfilt(signal.butter(2, 38, "high", fs=SR, output="sos"), dry)
    limited = signal.oaconvolve(dry, signal.firwin(257, 16150, fs=SR)[None], "same")
    return band_limit(limited + rack_gain(-20.5) * (dry - limited))


dry = scene()
out = record(dry)
wav_out(out)
```